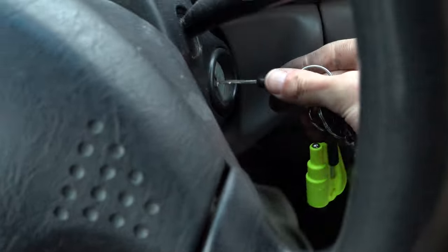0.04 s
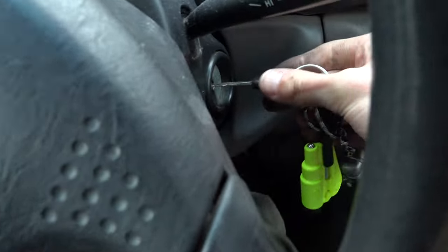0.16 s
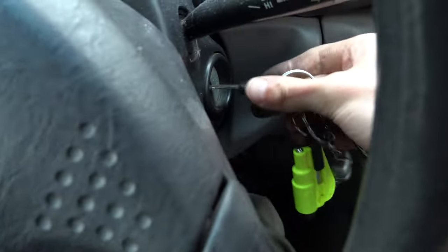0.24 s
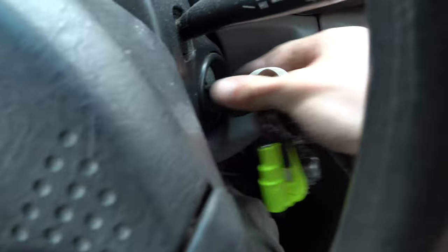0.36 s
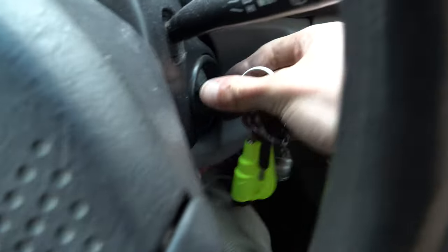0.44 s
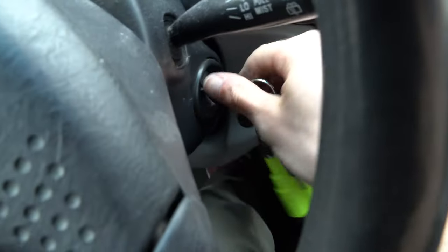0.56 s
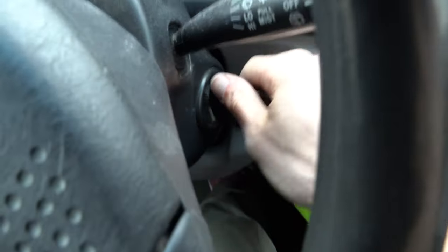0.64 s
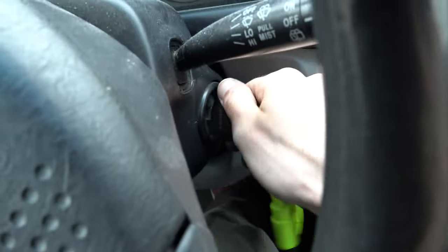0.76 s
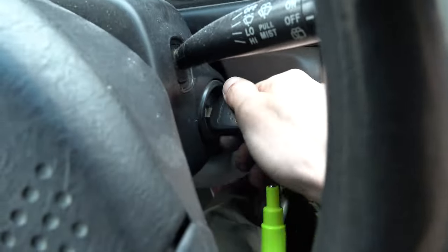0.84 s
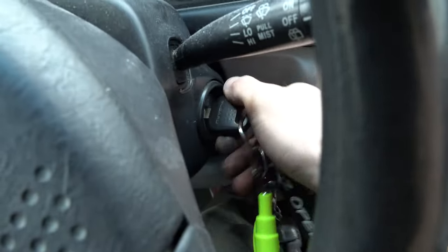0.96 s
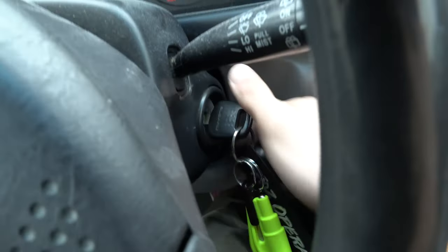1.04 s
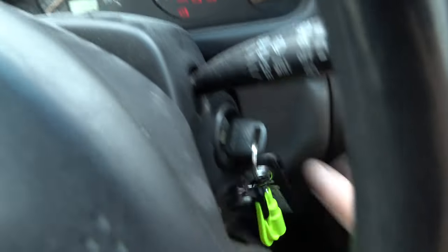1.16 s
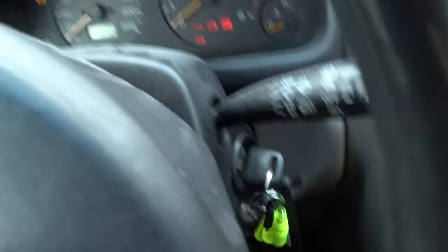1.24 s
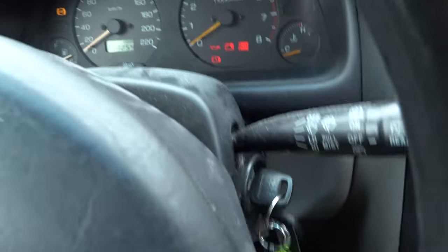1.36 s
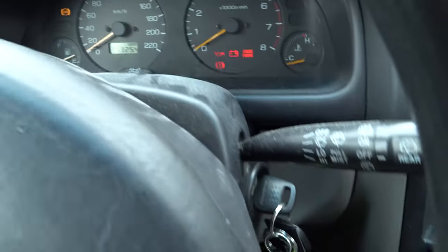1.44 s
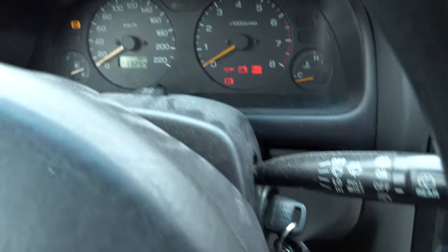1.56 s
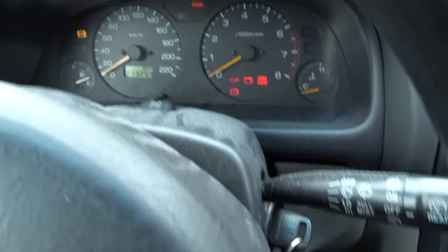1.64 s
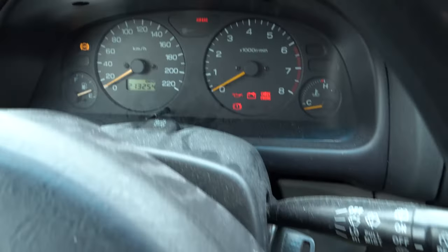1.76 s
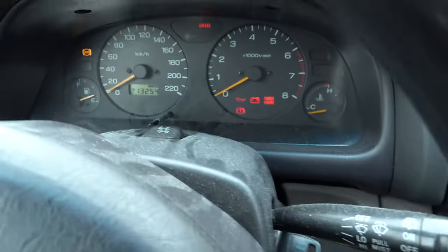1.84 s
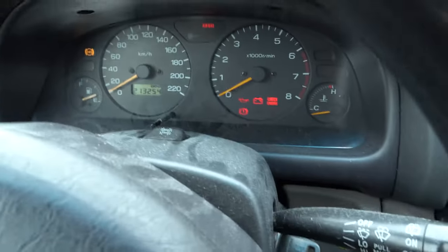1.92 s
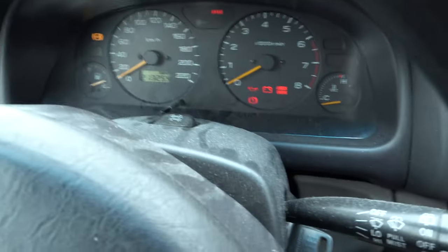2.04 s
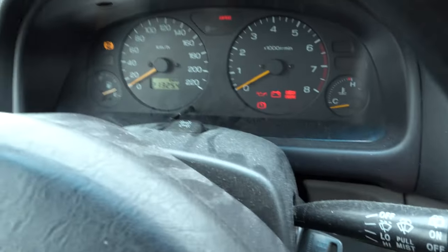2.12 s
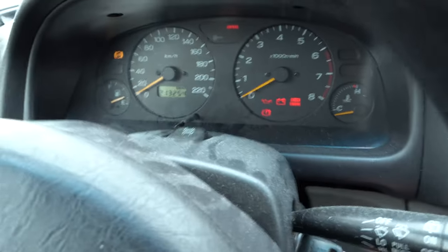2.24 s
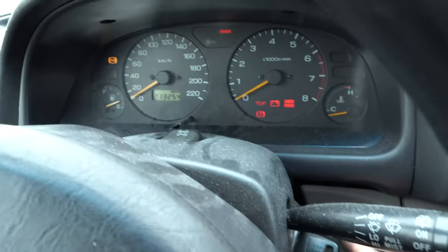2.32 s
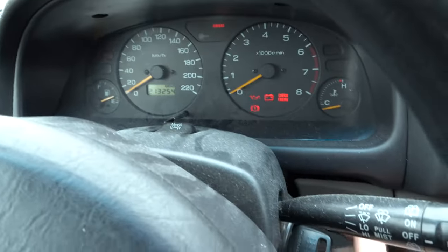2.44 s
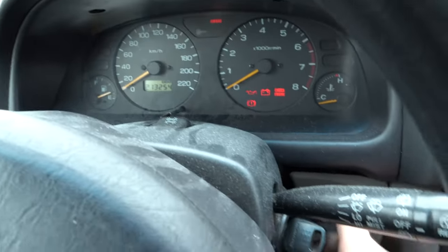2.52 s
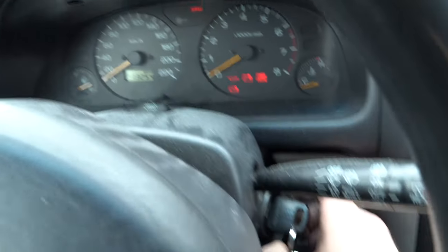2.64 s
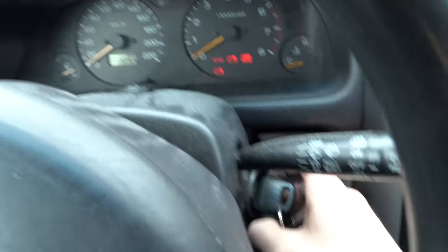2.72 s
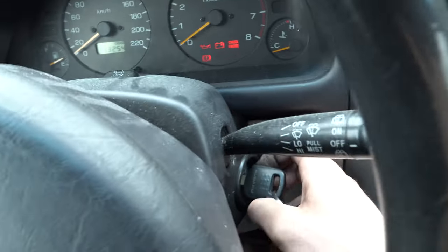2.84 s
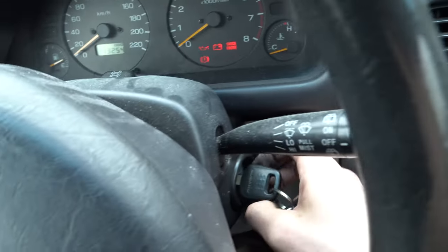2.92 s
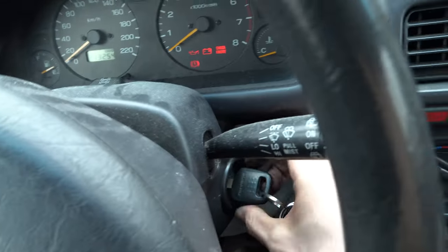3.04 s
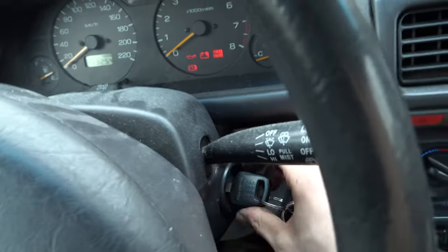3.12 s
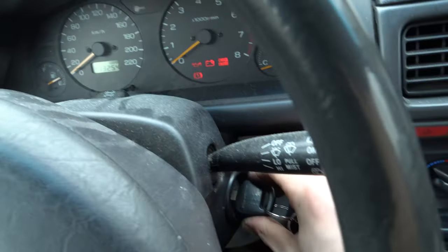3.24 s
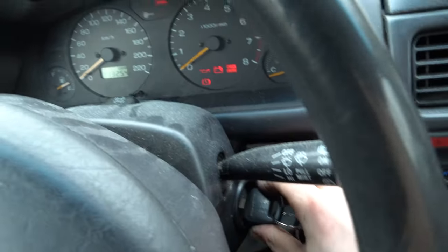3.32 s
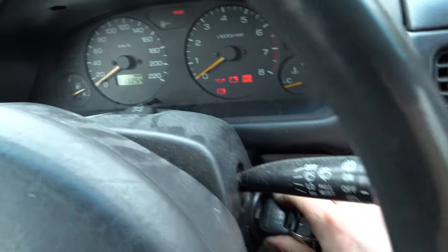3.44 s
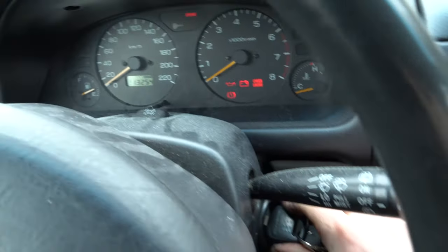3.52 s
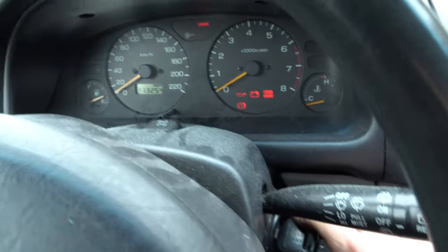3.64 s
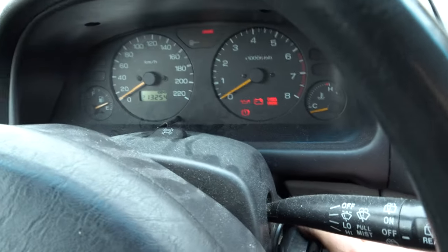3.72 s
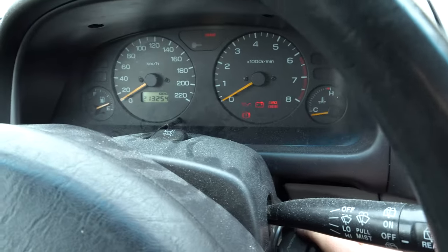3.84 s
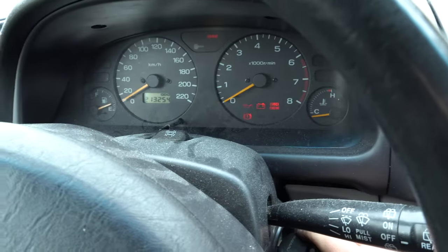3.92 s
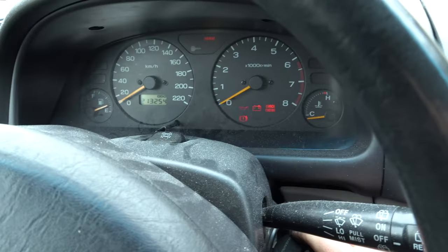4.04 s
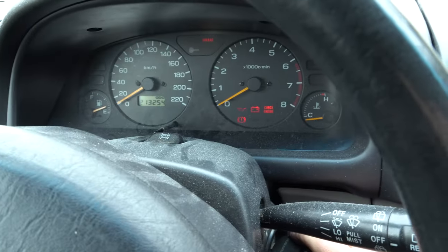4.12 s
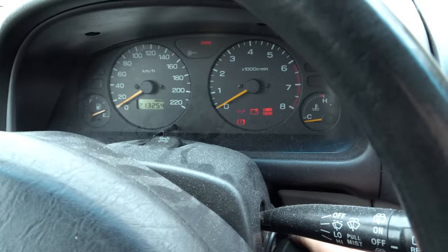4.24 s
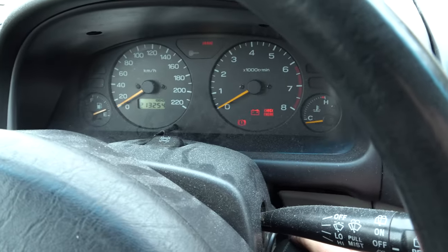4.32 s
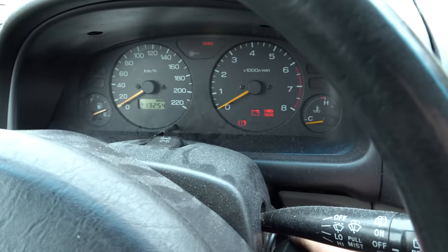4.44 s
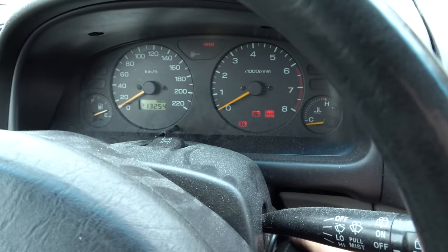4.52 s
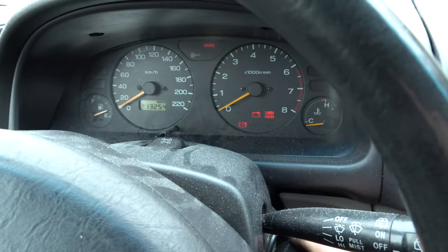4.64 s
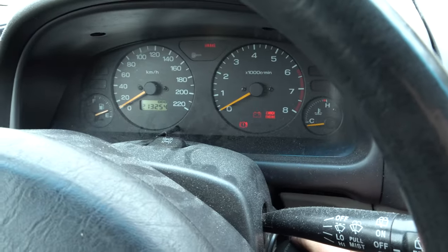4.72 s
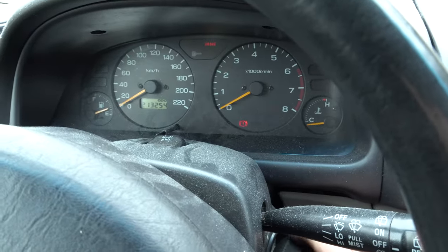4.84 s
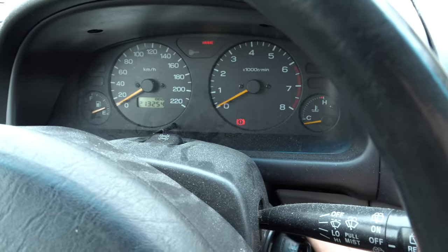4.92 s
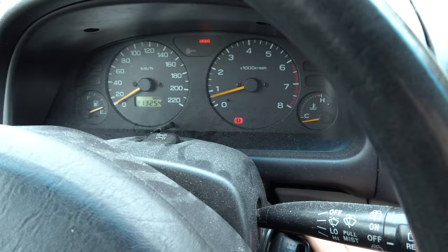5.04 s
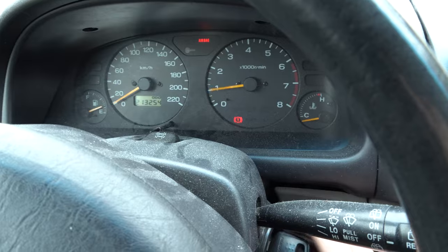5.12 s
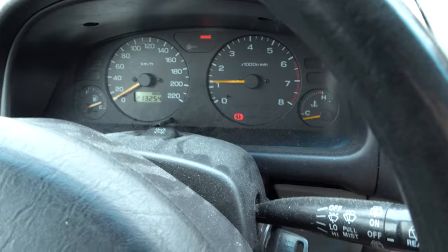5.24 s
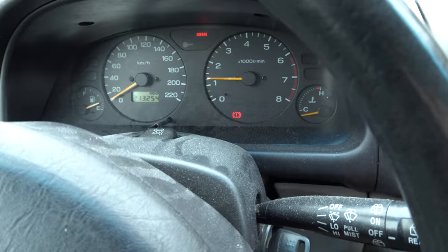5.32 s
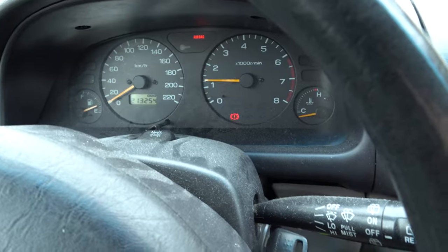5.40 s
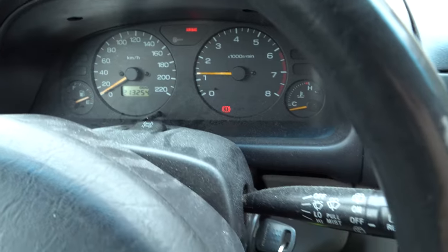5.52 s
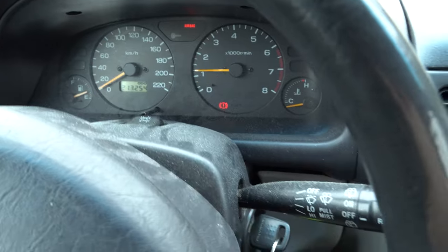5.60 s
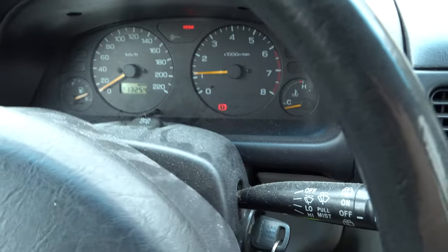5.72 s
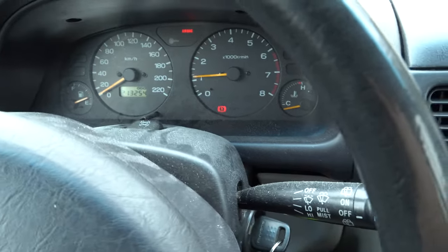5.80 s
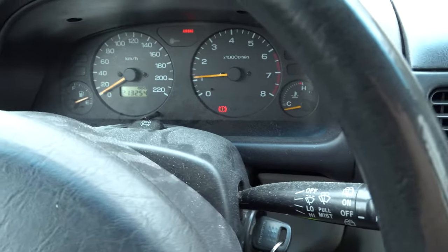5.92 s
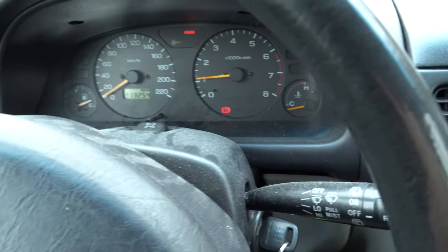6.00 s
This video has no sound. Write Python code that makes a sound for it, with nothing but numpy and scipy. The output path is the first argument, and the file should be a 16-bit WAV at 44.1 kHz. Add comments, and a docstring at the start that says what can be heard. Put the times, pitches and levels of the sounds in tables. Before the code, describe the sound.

Inside a parked car, a bunch of keys clatters against the steering column before the engine turns over, starts and idles.

```python
"""In a parked car, a bunch of keys clatters against the steering column as a key goes into the ignition.
At 3.9 seconds the starter motor begins to grind, kicking each time a piston squeezes its air.
At 4.8 seconds the engine catches and speeds up; the keys jangle again as it settles to idle.
Behind this, the seat thumps until the starter begins, and all along the hand-held microphone
picks up slowly swaying air, a soft hush and a faint fuel pump."""
import sys
import numpy as np
from scipy import signal
from scipy.fft import rfft, irfft, next_fast_len
from scipy.io import wavfile
from scipy.ndimage import uniform_filter1d

SR = 44100
rng = np.random.default_rng(int(sys.argv[2]) if len(sys.argv) > 2 else 0)


def materialize(psi):
    """Save the field psi as 16-bit PCM at rate SR to the path in sys.argv[1].

    A 1-D psi becomes a single channel; in a 2-D psi each row is a channel.
    """
    bounded = np.clip(np.atleast_2d(psi).T, -1, 1)
    quanta = np.round(bounded * 32767).astype(np.int16)
    wavfile.write(sys.argv[1], SR, quanta)


N = 267510

# Keys hitting each other. Each row: start in seconds, level in dB, high fizz in dB above that level,
# main ringing pitch in Hz, fade time in seconds (t60, the time to drop 60 dB), rise time in milliseconds.
KEY_STRIKES = [(0.055, -45, -12, 2100, 0.06, 1.3), (0.2358, -34, 0.5, 2030, 0.037, 1.3),
               (0.2758, -32, -5, 2260, 0.039, 1.2), (0.326, -24, -35, 2530, 0.07, 1.3),
               (0.342, -23.5, -26, 2620, 0.053, 1.3), (0.368, -40, 0, 2060, 0.041, 1.3),
               (0.397, -22, -5, 7800, 0.057, 1.2), (0.414, -27, -6, 7420, 0.077, 1.3),
               (0.4342, -18.5, -11, 2700, 0.042, 1.2), (0.4472, -22.5, -7.5, 3970, 0.18, 1.3),
               (0.4758, 0, -20, 4500, 0.035, 0.86), (0.5086, -12.5, -25, 2800, 0.038, 1.3),
               (0.5434, -44, -4, 7430, 0.048, 1.3), (0.5751, -19, -20, 2980, 0.027, 1.1),
               (0.5922, -21, -18, 2410, 0.069, 1.2), (0.6301, -14.5, -5.5, 3090, 0.077, 1.6),
               (0.6952, -24, -13, 3330, 0.097, 1.8), (0.7103, -15.5, -7, 7800, 0.045, 1.5),
               (0.766, -16, -10, 2600, 0.11, 1.6), (0.821, -2.5, -3.5, 2930, 0.053, 1.5),
               (0.906, -14.5, -4.5, 4100, 0.079, 1.6), (0.915, -11.5, -4.5, 3100, 0.044, 1.4),
               (0.9724, -19, -9, 2340, 0.057, 1.3), (1.0023, -13.5, -13, 6060, 0.063, 1.3),
               (1.0943, -22.5, -20, 3320, 0.097, 1), (1.1377, -19, -26, 2040, 0.027, 1.2),
               (1.1497, -12, -11, 7330, 0.058, 1.1), (1.2194, -1.5, -14, 2070, 0.041, 0.87),
               (1.3029, -32, -22, 2640, 0.046, 1.3), (1.3285, -9.5, -28, 2050, 0.07, 1.3),
               (1.3633, -12.5, -16, 2060, 0.035, 1.3), (1.3762, -5, -9, 6670, 0.033, 1.1),
               (1.4168, -12.5, -17, 3440, 0.056, 1.5), (1.4603, -34, -5, 3410, 0.04, 1.3),
               (1.4921, -11, -8.5, 3540, 0.056, 0.82), (1.5002, -18, -6, 3460, 0.1, 1.3),
               (1.5633, -33, -8, 3470, 0.098, 1.3), (1.585, -30, -4, 5300, 0.058, 1.3),
               (1.7466, -38.5, -9, 3630, 0.079, 1.3), (1.827, -28.5, -17, 3380, 0.083, 1.5),
               (2.4014, -25, -24, 2850, 0.041, 1), (2.4755, -19.5, -37, 1980, 0.053, 0.97),
               (2.5202, -15.5, -17, 2330, 0.054, 1.2), (2.5431, -19.5, -27, 4700, 0.036, 1.3),
               (2.5705, -32, -6, 7600, 0.051, 1.3), (2.6336, -32, -12, 2000, 0.038, 1.3),
               (2.6778, -28.5, -6, 4480, 0.073, 1.5), (2.73, -23.5, -19, 4500, 0.057, 1.4),
               (2.7496, -27.5, -5, 5600, 0.065, 1.3), (2.8414, -36, -21, 3010, 0.06, 1.3),
               (2.8744, -21.5, -18, 4630, 0.087, 1.3), (2.949, -26, -11, 2530, 0.072, 1.3),
               (2.966, -15, -28, 5200, 0.078, 1.4), (3.0205, -15, -9, 5430, 0.074, 1.6),
               (3.07, -31, -7, 7150, 0.055, 1.3), (3.0989, -34, -13, 5460, 0.046, 1.3),
               (3.1281, -12, -8, 7730, 0.088, 1.3), (3.1986, -31.5, -29, 2110, 0.06, 1.3),
               (3.4137, -15.5, -23, 2850, 0.058, 0.93), (3.8276, -31.5, -5.5, 2560, 0.045, 1.3),
               (3.8861, -40, -28, 2080, 0.06, 1.3), (3.9716, -28, -28, 2940, 0.038, 1.3),
               (4.3933, -19.5, -15, 4480, 0.06, 1.15), (5.0063, -15, -8.5, 2310, 0.051, 1.6),
               (5.0728, -24.5, -6.5, 7140, 0.087, 1.5), (5.1967, -30.5, -10, 2220, 0.052, 1.3),
               (5.247, -27, -25, 5080, 0.034, 1.3), (5.265, -18, -29, 3500, 0.073, 1.3),
               (5.2924, -19, -2, 3470, 0.043, 1.5), (5.3045, 1.5, -12.5, 2400, 0.04, 1.5),
               (5.369, -18, -23, 2000, 0.037, 1.5), (5.4115, -17.5, -11, 3270, 0.064, 1.3),
               (5.4424, -27.5, -6, 3570, 0.12, 1.5), (5.5448, -30.5, -13, 3430, 0.096, 1.3),
               (5.6227, -21.5, -17, 4600, 0.085, 1.3), (5.6592, -28.5, -18, 3140, 0.11, 1.4),
               (5.686, -17.5, -7, 5100, 0.087, 1.3), (5.745, -30, -10, 3550, 0.18, 1.7),
               (5.7886, -33.5, -8, 4060, 0.1, 1.8), (5.89, -38, -10, 2030, 0.044, 1.8),
               (5.9155, -37, -6, 3370, 0.077, 1.3)]
# The tones of a ringing key. Each row: pitch in Hz, level in dB, fade time in seconds.
KEY_TONES = [(2310, -6, .04), (2750, -5, .03), (3200, -6, .03), (3520, 0, .06), (4500, -5, .035),
             (5280, -3, .05), (6100, -6, .035), (7250, -4, .045), (7700, -6, .035), (8600, -8, .035),
             (9300, -7, .04), (10150, -9, .05), (11450, -9, .04), (13750, -11, .04)]
# The keys differ in size. Each number multiplies the pitches of one key.
KEY_PITCH_FACTORS = [.9, .95, 1, 1.06, 1.12]
# The tone colour of the clatter and of its thin fizz. Each row: frequency in Hz, level in dB.
CLATTER_COLOUR = [(700, -8), (1500, 1), (3000, 0.5), (5000, 0.5), (8000, -2.5), (11000, -34)]
FIZZ_COLOUR = [(5000, -33), (8000, -2.5), (12000, -9), (15500, -10)]


def key_strikes():
    """Each strike is a sharp crack and a rattle of tiny contacts, and sets a random key ringing."""
    start, db, fizz_db, main_hz, t60, rise_ms = np.transpose(KEY_STRIKES)
    rise = rise_ms / 1000
    contacts = flutter(hz=340, depth_db=2.2)
    clatter = bursts(start, db - 12.5, t60, rise)  # the rattle
    clatter += bursts(start, db - 5.5, 0.0067, 0.44 * rise)  # the crack
    fizz = bursts(start, db + fizz_db - 4.5, 0.71 * t60, rise)
    fizz += bursts(start, db + fizz_db - 16.5, 0.006, 0.24 * rise)
    out = contacts * (clatter * noise(CLATTER_COLOUR) + fizz * noise(FIZZ_COLOUR))
    ring_left = 0.6  # touching keys ring for only this share of their usual time
    rings = [ring(np.multiply(KEY_TONES, [pitch, 1, ring_left])) for pitch in KEY_PITCH_FACTORS]
    chosen = rng.integers(0, len(rings), len(start))
    tone_gains = amp(2 * rng.standard_normal((len(start), len(KEY_TONES))))
    for k in range(len(start)):
        key_ring = tone_gains[k] @ rings[chosen[k]]
        add(out, start[k], rattled(key_ring, db[k] - 41, t60[k], rise[k]))
        main_ring = ring([(main_hz[k], 0, .008)])[0]
        add(out, start[k], rattled(main_ring, db[k] - 23.5, 0.92 * t60[k], rise[k]))
    return out


# The key fob and hand knocking the steering column's plastic cover.
# Each row: start in seconds, level in dB, brightness in dB per octave, fade time in seconds.
COVER_KNOCKS = [(0.062, -34, -17, 0.094), (0.21, -30.5, 2, 0.043), (0.281, -36, -22, 0.079),
                (0.327, -21.5, 4, 0.2), (0.415, -24.5, -16, 0.11), (0.435, -22, 4, 0.18),
                (0.477, -10.5, 6.5, 0.12), (0.576, -30.5, -3, 0.6), (0.63, -23.5, 5, 0.11),
                (0.711, -19, 5, 0.085), (0.823, -14, 8, 0.11), (0.916, -12, -8, 0.13),
                (1.002, -25, 5, 0.026), (1.1, -32, -44, 0.057), (1.149, -20.5, 3, 0.028),
                (1.183, -44, -4, 0.091), (1.22, 2, 0.5, 0.069), (1.302, -36, 12.5, 0.048),
                (1.329, 1, -3, 0.078), (1.364, -26, -7, 0.11), (1.493, -34, -19, 0.074),
                (1.939, -37, -5, 0.093), (2.096, -37, 0, 0.14), (2.403, -21, -8, 0.058),
                (2.476, -18.5, -22, 0.14), (2.52, -9, -7, 0.074), (2.548, -40, -21, 0.051),
                (2.666, -31.5, -12, 0.25), (2.739, -53, -13, 0.05), (2.799, -26.5, -1, 0.019),
                (2.864, -30, -11, 0.27), (2.95, -26, 12, 0.14), (3.02, -18, 8, 0.02),
                (3.049, -20, -30, 0.06), (3.127, -18.5, 6, 0.034), (3.327, -30.5, -29, 0.036),
                (3.413, -30, 13, 0.026), (5.267, -34, -7, 0.062), (5.303, 0, 2, 0.076),
                (5.369, -15, -1, 0.065), (5.413, -23, -11, 0.059), (5.684, -29, -7, 0.066)]
# The tones of the cover. Each row: pitch in Hz, level in dB, fade time in seconds.
COVER_TONES = [(545, -11, .05), (612, -5, .11), (655, -4, .07), (740, -6, .04), (840, 0, .055),
               (960, -7, .04), (1110, -5, .05), (1200, -11, .12), (1450, -9, .035), (1820, -10, .04),
               (2060, -8, .04)]
# The tone colour of a knock. Each row: frequency in Hz, level in dB.
KNOCK_COLOUR = [(150, -43), (300, -10), (450, -8), (600, 1.5), (900, -6), (1600, -9.5), (3000, -21.5)]


def column_knocks():
    """One blow and a dull rattle make the cover ring; brighter knocks bring out its higher tones."""
    start, db, brightness, t60 = np.transpose(COVER_KNOCKS)
    out = bursts(start, db - 8, t60, rise_s=0.00057) * noise(KNOCK_COLOUR)
    rings = ring(COVER_TONES)
    octaves = np.log2(np.transpose(COVER_TONES)[0] / 800)
    for k in range(len(start)):
        tone_gains = amp(brightness[k] * octaves + 0.58 * rng.standard_normal(len(COVER_TONES)))
        cover = tone_gains @ rings
        add(out, start[k], amp(db[k] - 15.5) * cover)
        add(out, start[k], rattled(cover, db[k] - 33.5, 0.65 * t60[k], rise_s=0.00073))
    return out


# Keys dragging over each other, one list per movement. Each row: time in seconds, level in dB.
SCRAPE_MOVES = [
    [(.28, -75), (.33, -54), (.38, -70), (.45, -51), (.53, -48), (.56, -71), (.64, -50), (.73, -59),
     (.8, -58), (.95, -71), (1.04, -56), (1.07, -75)],
    [(1.5, -41), (1.6, -63), (1.73, -71.5), (1.77, -52), (1.95, -70), (2.38, -60.5)],
    [(2.4, -60), (2.55, -59), (2.62, -65.5), (2.75, -53), (2.85, -56.5), (3.03, -51.5), (3.18, -53),
     (3.3, -65)],
    [(5.05, -62), (5.22, -64), (5.28, -47), (5.39, -73), (5.43, -45.5), (5.52, -60), (5.6, -62.5),
     (5.65, -52.5), (5.77, -45), (5.86, -67.5), (5.93, -56), (5.97, -71)],
]
# The tone colour of the scraping. Each row: frequency in Hz, level in dB.
SCRAPE_COLOUR = [(500, -39), (900, 9), (1800, 8.5), (3500, -0.5), (5500, 3.5), (8000, 10), (11000, -9.5),
                 (14000, -11), (16000, -44)]


def key_scrapes():
    """Sliding keys rub with a grainy noise and sing faintly at their own tones."""
    level = sum(gate * amp(db) for gate, (db,) in map(curve, SCRAPE_MOVES))
    singing = evened(signal.oaconvolve(rng.standard_normal(N), ring(KEY_TONES).sum(0))[:N])
    return level * flutter(hz=100, depth_db=2.45) * (noise(SCRAPE_COLOUR) + .5 * singing)


# Kicks from the starter's switch, its gear and the pistons squeezing air. Each row: start in seconds,
# level in dB, fade time in seconds, level in dB of the engine's shudder afterwards.
STARTER_KICKS = [(3.8295, -30.5, .11, -46), (3.91, -28.5, 0.06, -29), (4.333, -28.5, 0.083, -29),
                 (4.501, -37.5, 0.17, -31.5), (4.659, -34.5, 0.092, -30.5), (4.7357, -33, 0.13, -41),
                 (4.792, -34, 0.21, -37), (4.914, -38.5, 0.14, -32.5), (4.9757, -31, .11, -40),
                 (5.007, -43, 0.13, -28)]
# The tones of the starter's metal case. Each row: pitch in Hz, width in Hz, level in dB.
CASE_TONES = [(1110, 79, 21.5), (1358, 46, 28), (1800, 20, 5), (1927, 70, 10.5), (2353, 156, 16),
              (2846, 76, 14.5), (3100, 91, -25), (3600, 42, -16), (3800, 79, -23), (4280, 60, 5)]
# The tone colour of the grind and of the shudder. Each row: frequency in Hz, level in dB.
GRIND_COLOUR = [(250, 5.5), (500, 3), (900, 4), (1600, 2.5), (2500, -1.5), (3600, -2.5), (4300, -14),
                (5500, -18), (9000, -31.5), (12500, -59), (13800, -35), (15500, -45)]
SHUDDER_COLOUR = [(18, -33), (30, -5), (59, 7), (119, -7), (161, -5.5), (301, -8), (363, -18.5),
                  (479, -10.5), (600, -23), (780, -13), (1320, -120)]


def starter():
    """Gear teeth chatter into the metal case; around each kick they slow down and turn rougher."""
    on_s, off_s = 3.912, 5.04
    free_teeth_hz, loaded_teeth_hz = 248, 232
    t = np.arange(N) / SR
    gate = np.clip(np.minimum((t - on_s) / 0.019, (off_s - t) / 0.017) + 1, 0, 1)
    start, kick_db, t60, shudder_db = np.transpose(STARTER_KICKS)
    last_kick = np.maximum(np.searchsorted(start, t) - 1, 0)
    since_kick = abs(t - start[last_kick])
    until_kick = abs(np.append(start, N / SR)[last_kick + 1] - t)
    load = np.exp(-abs(t - start[:, None]).min(0) / 0.06)  # 1 at a kick, near 0 between kicks
    choke_db = -4.5 * np.exp(-until_kick / 0.025)  # the grind dips just before a kick
    effort = gate * amp(-36.5 + choke_db) + bursts(start, kick_db, t60, rise_s=0.0015)
    teeth_hz = free_teeth_hz + (loaded_teeth_hz - free_teeth_hz) * load
    teeth_passed = np.cumsum(teeth_hz * flutter(hz=40, depth_db=.06)) / SR
    clicks = evened(np.diff(np.floor(teeth_passed), prepend=0) * flutter(hz=60, depth_db=2))
    rough = flutter(hz=100, depth_db=2) * rng.standard_normal(N)
    click_share = 0.8 - 0.5 * load
    teeth = click_share * clicks + np.sqrt(1 - click_share ** 2) * rough
    case = sum(amp(db) * resonate(resonate(teeth, hz, 2 * width), hz, 2 * width)
               for hz, width, db in CASE_TONES)
    grind = 0.6 * evened(case) + 0.74 * coloured(teeth, GRIND_COLOUR)
    shudder = amp(shudder_db[last_kick] - 46 * since_kick)  # fades by 46 dB a second
    shudder = uniform_filter1d(shudder, size=300) * flutter(hz=41, depth_db=3.2)
    return effort * grind + gate * shudder * noise(SHUDDER_COLOUR)


# How loud the engine is. Each row: time in seconds, then the boom, roar and valve hiss levels in dB.
ENGINE_LEVELS = [(4.78, -38, -34, -43), (4.85, -32, -34, -42), (5.02, -24.5, -39, -46.5),
                 (5.23, -28, -35, -46.5), (5.42, -29.5, -37, -45.5), (6.07, -39, -39, -61)]
# How fast it runs. Each row: time in seconds, firings a second, level of the firing hum in dB.
ENGINE_SPEED = [(4.75, 32, -40), (4.9, 40, -30), (5.05, 47, -26), (5.15, 50, -24.5), (5.3, 48.5, -27),
                (5.45, 43, -34), (5.6, 36.5, -27), (5.8, 36, -25.5), (6.07, 36, -25)]
# The tones of the firing hum. Each row: multiple of the firing rate, level in dB.
HUM_TONES = [(1, 0), (3, -14), (4.5, -19), (5.5, -22)]
# The tone colour of the cabin's boom, the roar and the valves. Each row: frequency in Hz, level in dB.
BOOM_COLOUR = [(20, 6), (36, 8), (50, 5), (65, -19), (86, 11.5), (108, -2), (130, -27), (162, -4.5),
               (200, -22), (240, -31), (280, -2), (330, -11.5)]
ROAR_COLOUR = [(24, -21), (40, -8.5), (65, -8.5), (96, -31.5), (134, -16), (168, -19), (362, -23),
               (592, -32), (700, -32), (910, -33), (1540, -120)]
VALVE_COLOUR = [(290, -22), (500, -11), (811, 5), (1360, 6), (1620, -1), (1820, -40), (9000, -56),
                (11700, -84), (19800, -120)]
# A shaking floor panel: pitch in Hz, width in Hz, level in dB compared with the boom.
FLOOR_PANEL = (92, 17, -11)
# The first firing: start in seconds, level in dB, fade time in seconds.
FIRST_FIRING = (4.806, -21, 0.19)


def engine():
    """Four cylinders fire in turn and make the cabin boom; roar and valve hiss throb with each firing."""
    gate, (boom_db, roar_db, hiss_db) = curve(ENGINE_LEVELS, fade_s=0.027)
    _, (firing_hz, hum_db) = curve(ENGINE_SPEED)
    firings = np.cumsum(firing_hz) / SR
    firings -= firings[round(4.4 * SR)]  # cycles are counted from 4.4 seconds
    firing_lift_db, shaft_lift_db = -0.5, 1.5
    boom = np.zeros(N)
    for k in range(2, 29):  # tones nearly in step add up to one strong pressure dip every four firings
        lift_db = firing_lift_db * (k % 4 == 0) + shaft_lift_db * (k % 4 == 2)
        gain = amp(level_at(BOOM_COLOUR, firing_hz * k / 4) + lift_db)
        boom -= gain * np.cos(2 * np.pi * (k / 4 * firings + rng.normal(0, 0.21)))
    boom /= np.sqrt(np.mean(boom[gate > 0] ** 2))
    hum = -np.sqrt(2) * sum(amp(hum_db + db) * np.cos(2 * np.pi * k * firings) for k, db in HUM_TONES)
    panel = noisy_tone(*FLOOR_PANEL)
    throb = evened(1.03 + np.exp(-(firings % 1) / 0.55))
    roar = (amp(roar_db) * throb + bursts(*FIRST_FIRING, rise_s=0.0023)) * noise(ROAR_COLOUR)
    hiss = amp(hiss_db) * throb * noise(VALVE_COLOUR)
    return gate * (amp(boom_db) * (boom + panel) + hum + roar + hiss)


# The driver shifting in the seat.
# Each row: start in seconds, level in dB, pitch in Hz, fade time in seconds.
SEAT_THUMPS = [(0.313, -32, 118, 0.048), (0.433, -27, 220, 0.16), (0.574, -28.5, 202, 0.12),
               (0.583, -21, 60, 0.17), (0.63, -21, 48.6, 0.21), (0.818, -27, 327, 0.23),
               (0.905, -33, 198, 0.14), (1.026, -25.5, 153, 0.2), (1.214, -33, 137, 0.096),
               (1.322, -41, 318, 0.1), (2.04, -34, 80, 0.19), (2.406, -21.5, 174, 0.15),
               (2.438, -27, 155, 0.14), (2.518, -27.5, 208, 0.17), (2.578, -25.5, 97, 0.1),
               (2.681, -7.5, 93, 0.046), (2.722, -35, 310, 0.07), (2.805, -19, 185, 0.037),
               (2.826, -19.5, 89, 0.08), (2.858, -20, 103, 0.11), (2.884, -14, 91, 0.057),
               (2.92, -28, 139, 0.088), (2.948, -31.5, 256, 0.13), (3.027, -28, 150, 0.16),
               (3.076, -27, 137, 0.11), (3.26, -40, 188, 0.24), (3.562, -47.5, 258, 0.081),
               (3.734, -34.5, 92, 0.095)]


def seat_thumps():
    """The seat gives dull thumps, each a short puff of low noise."""
    out = np.zeros(N)
    for start, db, hz, t60 in SEAT_THUMPS:
        puff = resonate(rng.standard_normal(SR // 4), hz, width=hz)
        puff = resonate(puff, hz, width=hz)
        add(out, start, evened(puff) * blow(db, t60, rise_s=0.0044))
    return out


def cabin_echo(sound):
    """The small cabin answers with a short, dense echo whose high notes die first."""
    t = np.arange(SR // 4) / SR
    dull = signal.lfilter([.25], [1, -.75], rng.standard_normal(len(t))) * amp(-60 * t / 0.18)
    bright = 0.84 * rng.standard_normal(len(t)) * amp(-60 * t / 0.11)
    tail = (dull + bright) * (t > .003)
    return signal.oaconvolve(sound, tail / np.linalg.norm(tail))[:N]


# How strongly the air sways. Each row: time in seconds, level in dB.
SWAY_LEVELS = [(0.0, -29.5), (0.15, -16.5), (0.9, -24.5), (1.96, -25.5), (2.09, -15.5), (2.28, -29.5),
               (2.4, -18.5), (2.72, -21), (2.8, -30), (2.96, -22), (3.72, -24.5), (3.87, -16), (4.05, -27),
               (5.36, -26.5), (5.47, -16.5), (5.68, -31.5), (5.9, -13), (6.07, -18)]
# The tone colour of the sway. Each row: frequency in Hz, level in dB.
SWAY_COLOUR = [(2, -23), (6, 4), (12, 9), (20, -1.5), (30, -15.5), (45, -32), (70, -29.5), (100, -61)]


def air_sway():
    """Air pressure rocks slowly at the microphone, mostly too low to hear."""
    _, (db,) = curve(SWAY_LEVELS)
    sway = noise(SWAY_COLOUR)
    sway /= np.sqrt(uniform_filter1d(sway ** 2, size=6000) + 0.17)  # evens out the swings
    return amp(db) * sway


# The cabin's background noise. Each row: time in seconds, hush level in dB, hiss level in dB.
HUSH_LEVELS = [(0, -42.5, -63), (.45, -40, -64.5), (1.3, -40, -54), (1.6, -41, -67), (1.85, -39, -53),
               (2.33, -41, -58), (3, -34.5, -55), (3.5, -46, -63), (3.8, -48, -67), (3.9, -40.5, -64),
               (4.75, -35.5, -58.5), (5.02, -30.5, -50.5), (5.7, -32, -67), (6.07, -32, -65)]
# The tone colour of the hush and of the hiss. Each row: frequency in Hz, level in dB.
HUSH_COLOUR = [(21, -39.5), (35, -9), (64, -31.5), (134, -32.5), (228, -29.5), (357, -37), (632, -41.5),
               (703, -44), (783, -44.5), (2500, -66), (3250, -99), (5500, -120)]
HISS_COLOUR = [(1200, 0), (2500, -5), (5000, -7), (9000, -14.5), (16000, -23)]


def cabin_hush():
    """A low hush and an airy hiss swell and fade."""
    _, (hush_db, hiss_db) = curve(HUSH_LEVELS)
    return amp(hush_db) * noise(HUSH_COLOUR) + amp(hiss_db) * noise(HISS_COLOUR)


# The tones of the fuel pump. Each row: pitch in Hz, width in Hz, level in dB.
PUMP_TONES = [(1230, 30, -65), (1634, 59, -56)]
# How the pump swells and fades. Each row: time in seconds, dB added to its tones.
PUMP_SWELL = [(0, -10), (2.9, -16), (3.2, -1), (3.7, -15), (3.9, 1), (6.07, -51)]


def fuel_pump():
    """The pump whines faintly at two pitches."""
    _, (swell_db,) = curve(PUMP_SWELL)
    return amp(swell_db) * sum(noisy_tone(*tone) for tone in PUMP_TONES)


def amp(db):
    """Turns dB into a number to multiply by."""
    return 10 ** (np.asarray(db) / 20)


def evened(x):
    """Scales a sound to an average (rms) strength of 1."""
    return x / np.sqrt(np.mean(x ** 2) + 1e-20)


def curve(rows, fade_s=0.023):
    """Gives a gate (1 while the table lasts, fading to 0 outside) and each column drawn over time."""
    times, *columns = np.transpose(rows)
    t = np.arange(N) / SR
    gate = np.clip(np.minimum(t - times[0], times[-1] - t) / fade_s + 1, 0, 1)
    return gate, [np.interp(t, times, column) for column in columns]


def level_at(colour, hz):
    """Looks up a tone colour's level in dB at the given frequencies."""
    table_hz, db = np.transpose(colour)
    return np.interp(np.log(hz + 1), np.log(table_hz + 1), db, left=-90, right=-90)


def coloured(x, colour):
    """Gives a sound a tone colour, at strength 1."""
    size = next_fast_len(N)
    gains = amp(level_at(colour, np.fft.rfftfreq(size, 1 / SR)))
    return evened(irfft(rfft(x, size) * gains, size)[:N])


def noise(colour):
    """Steady noise with a tone colour, at strength 1."""
    return coloured(rng.standard_normal(N), colour)


def flutter(hz, depth_db):
    """A random wobble around 1, up to about hz times a second."""
    return amp(depth_db * noise([(hz / 10, 0), (hz, 0), (2 * hz, -20)]))


def resonate(x, hz, width):
    """Keeps the part of a sound near one pitch; the width is in Hz."""
    decay = np.exp(-np.pi * width / SR)
    return 2 * signal.lfilter([1 - decay], [1, -decay * np.exp(2j * np.pi * hz / SR)], x).real


def noisy_tone(hz, width, db):
    """Noise narrowed down to a wavering tone."""
    return amp(db) * evened(resonate(rng.standard_normal(N), hz, width))


def ring(tones):
    """One fading wave per tone, as after a tap; neighbours start in opposite directions."""
    hz, db, t60 = np.transpose(tones)[:, :, None]
    t = np.arange(SR // 6) / SR
    direction = (-1) ** np.arange(len(hz))[:, None]
    return direction * amp(db - 60 * t / t60) * np.sin(2 * np.pi * hz * t)


def blow(db, t60, rise_s):
    """The loudness of one blow: it rises quickly and dies away."""
    t = np.arange(SR // 4) / SR
    return amp(db - 60 * t / abs(t60)) * (1 - np.exp(-t / abs(rise_s)))


def bursts(starts, db, t60, rise_s):
    """The loudness of many blows over the whole scene."""
    out = np.zeros(N)
    for start, *shape in np.broadcast(starts, db, t60, rise_s):
        add(out, start, blow(*shape))
    return out


def rattled(ringing, db, t60, rise_s):
    """A short rattle of tiny contacts, each setting off the same ringing."""
    rattle = blow(db, t60, rise_s)[:2000] * rng.standard_normal(2000)
    return signal.fftconvolve(ringing, rattle)


def add(mix, start_s, sound):
    """Mixes a sound in at its start time."""
    part = mix[round(start_s * SR):][:len(sound)]
    part += sound[:len(part)]


def scene():
    """Everything at one microphone; only the strikes, knocks and scrapes get an echo."""
    keys = key_strikes() + column_knocks() + key_scrapes()
    echo = amp(-17) * cabin_echo(keys)
    background = seat_thumps() + air_sway() + cabin_hush() + fuel_pump()
    return (keys + echo + background + starter() + engine())[None]


def record(dry):
    """The loudest knocks clip, then everything above 15900 Hz is filtered away."""
    clipped = np.clip(dry, -1, 1)
    low_pass = signal.firwin(255, 15900, window=("kaiser", 8), fs=SR)
    return signal.oaconvolve(clipped, low_pass[None], "same")


dry = scene()
out = record(dry)
materialize(out)
```